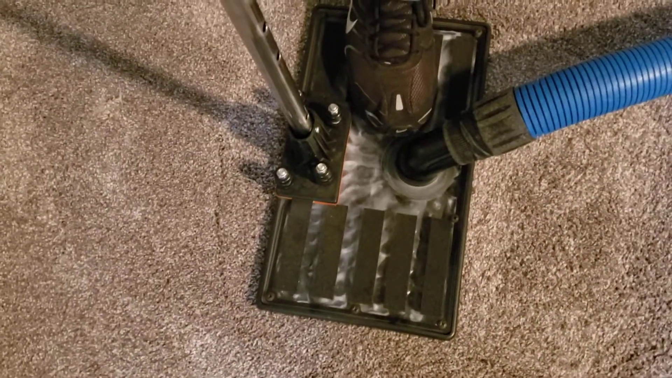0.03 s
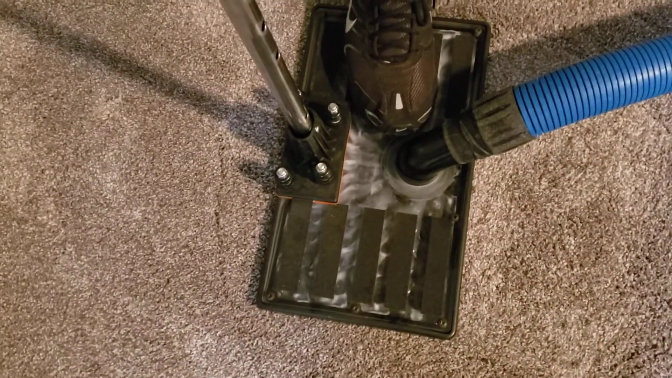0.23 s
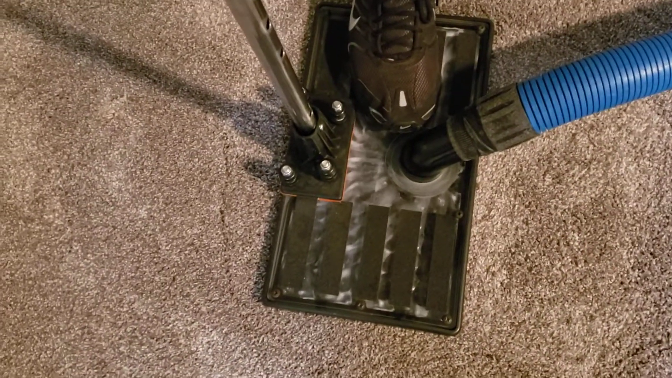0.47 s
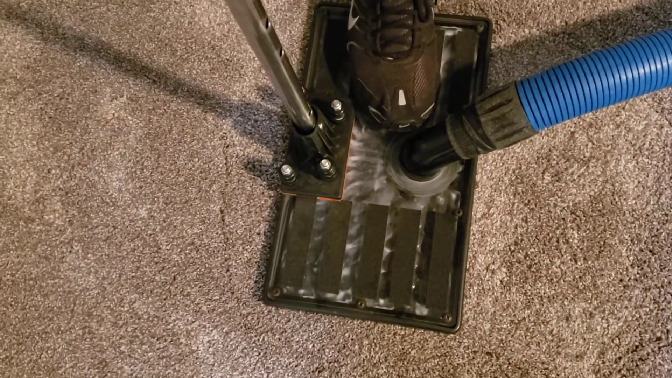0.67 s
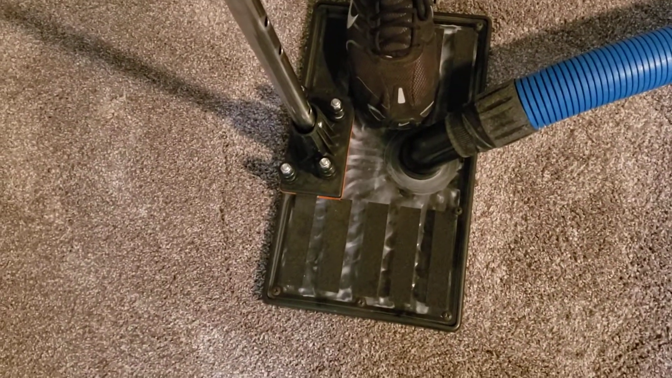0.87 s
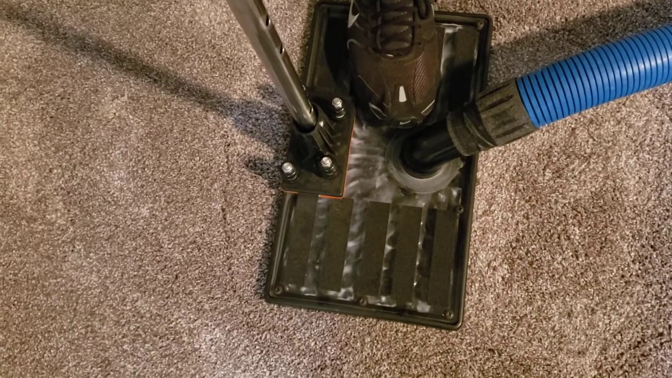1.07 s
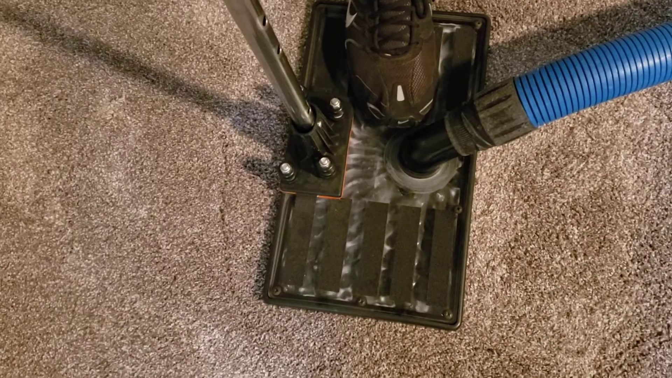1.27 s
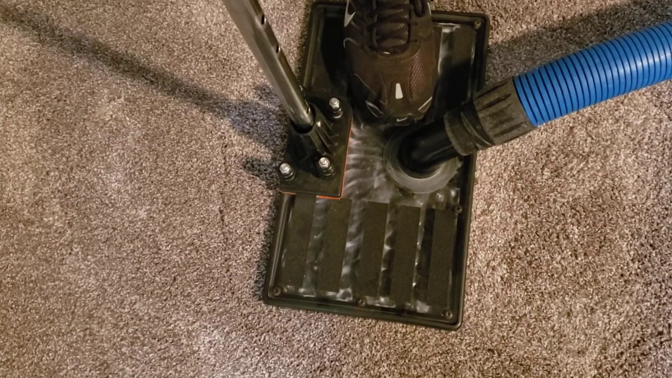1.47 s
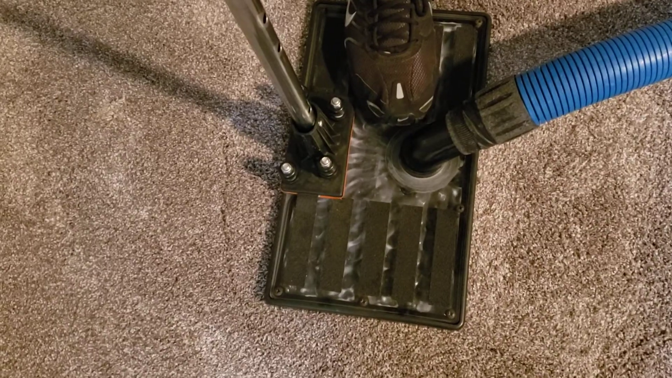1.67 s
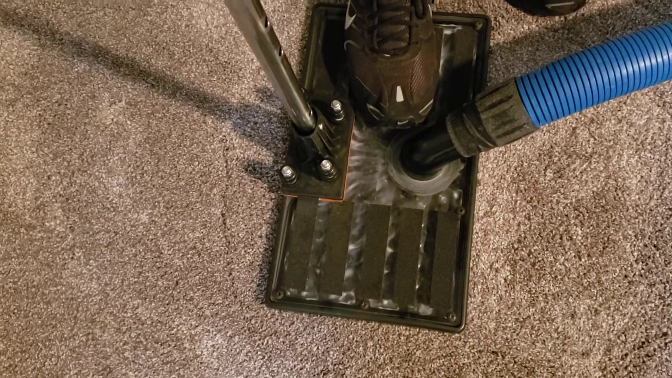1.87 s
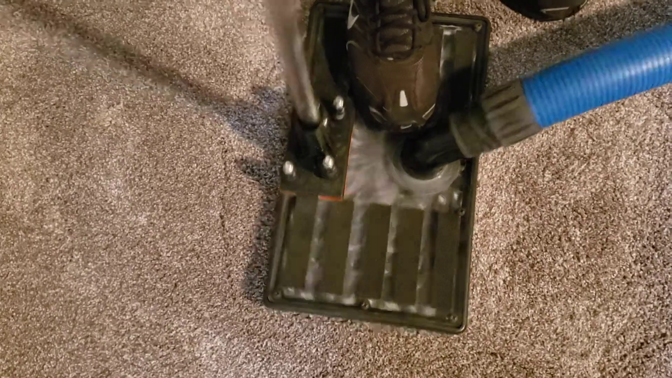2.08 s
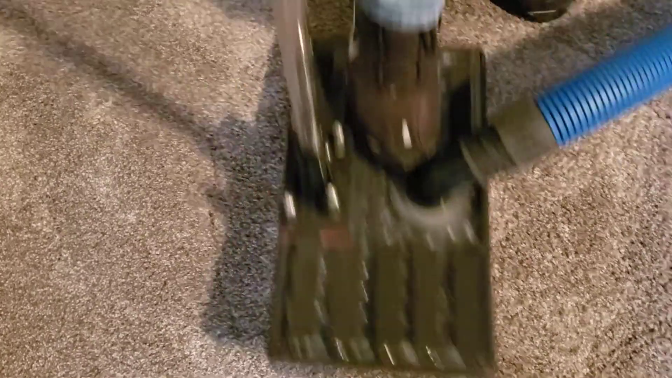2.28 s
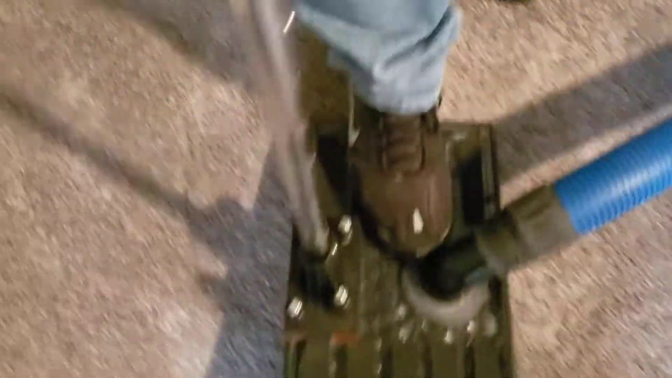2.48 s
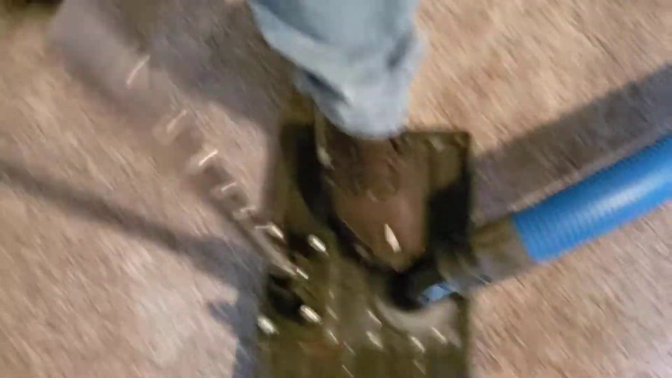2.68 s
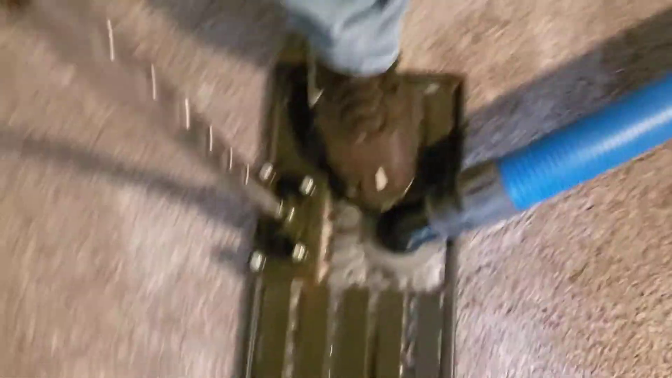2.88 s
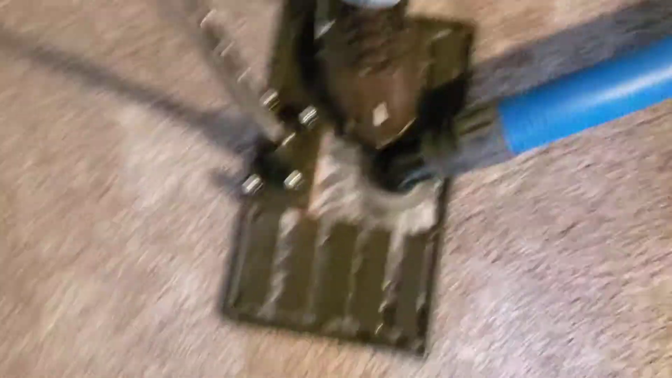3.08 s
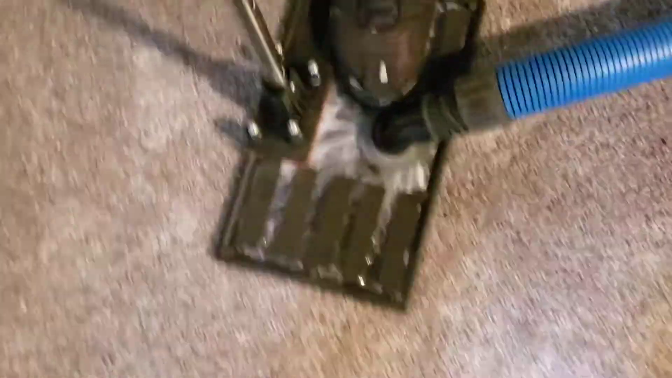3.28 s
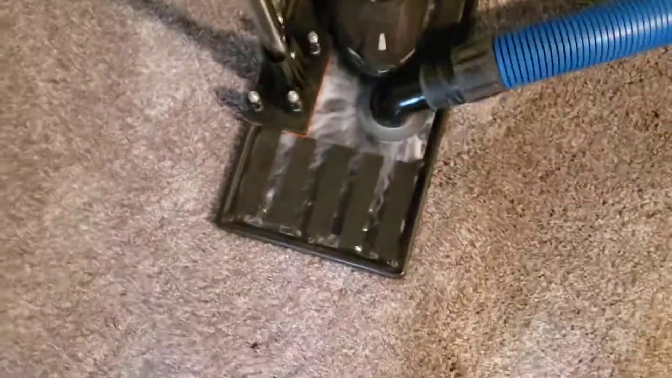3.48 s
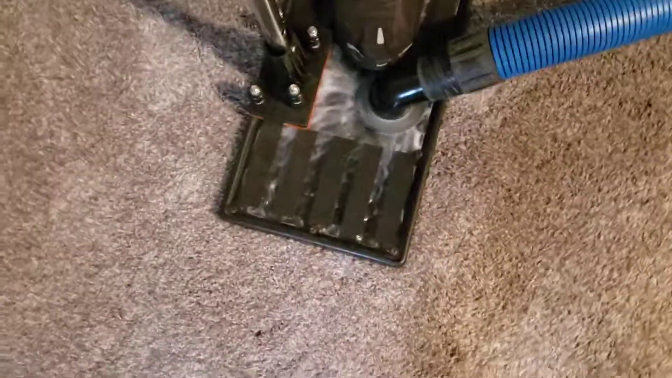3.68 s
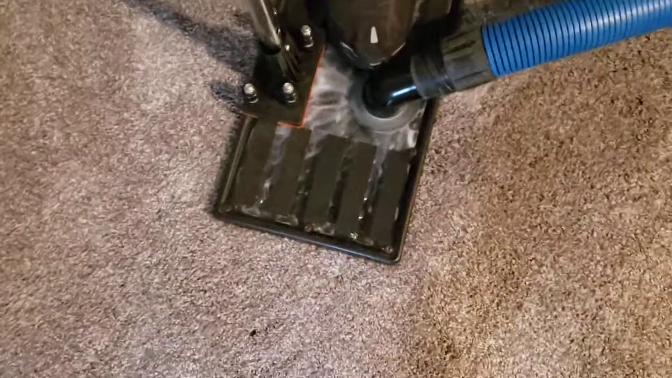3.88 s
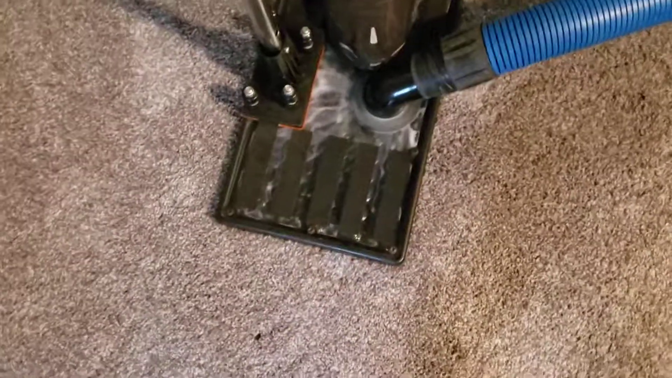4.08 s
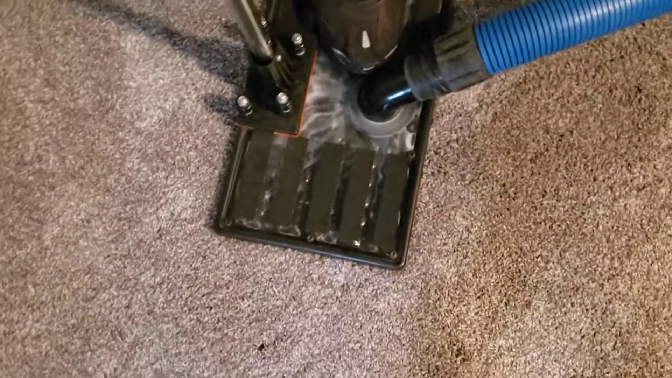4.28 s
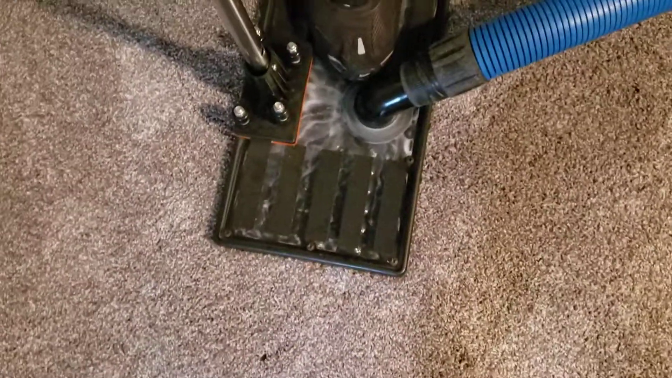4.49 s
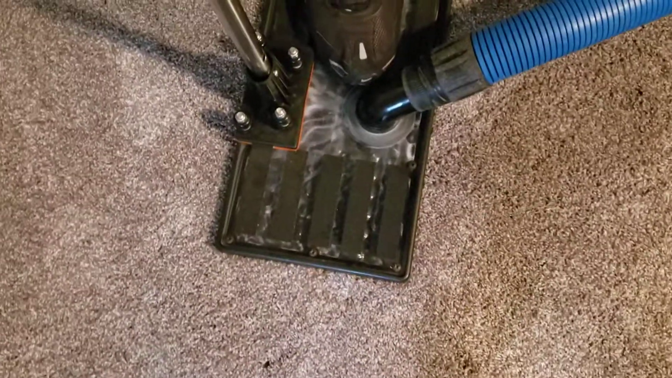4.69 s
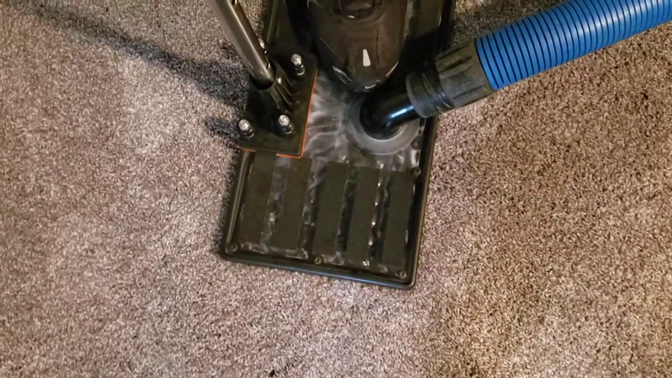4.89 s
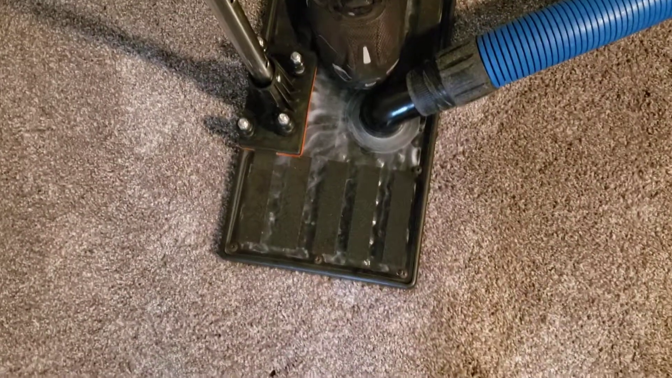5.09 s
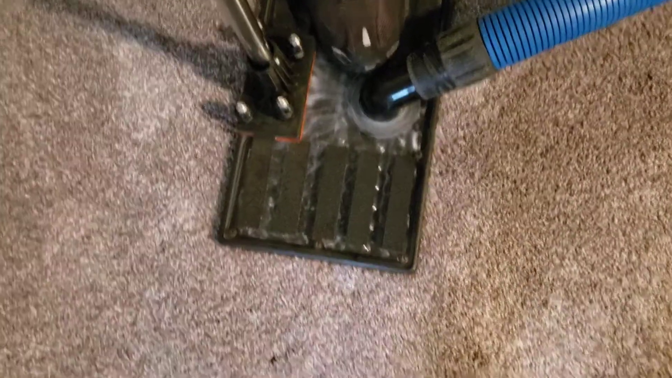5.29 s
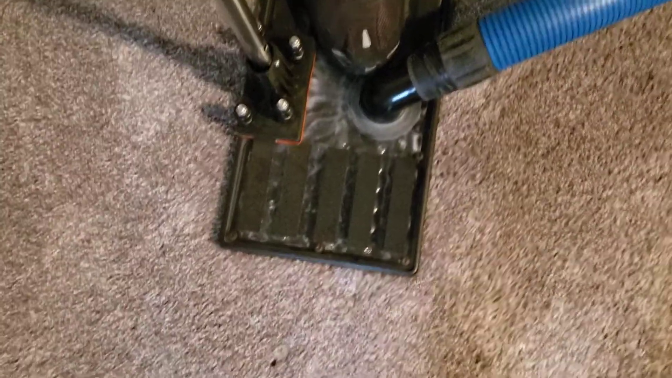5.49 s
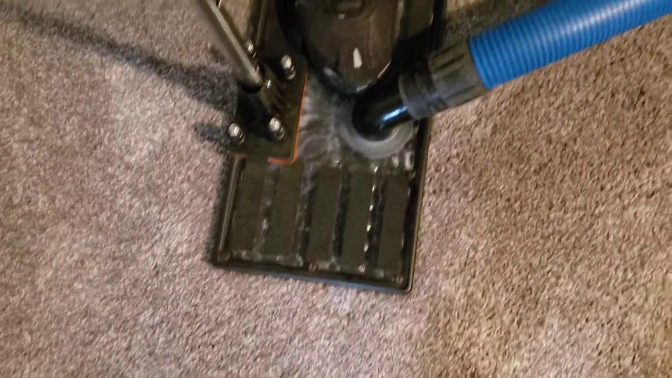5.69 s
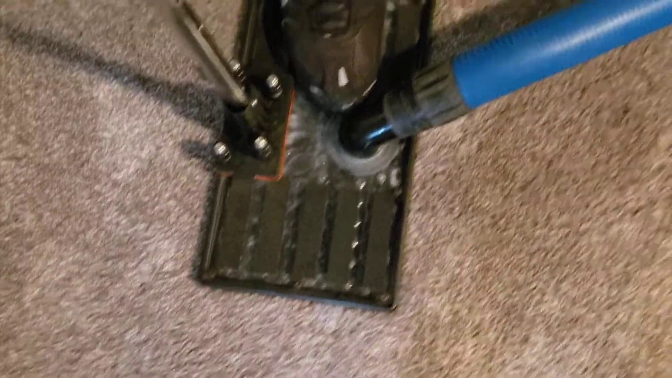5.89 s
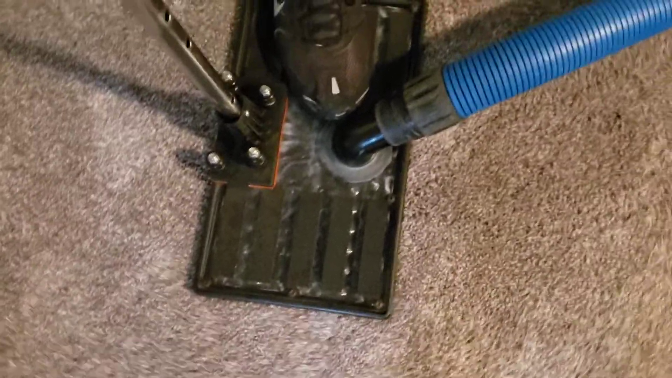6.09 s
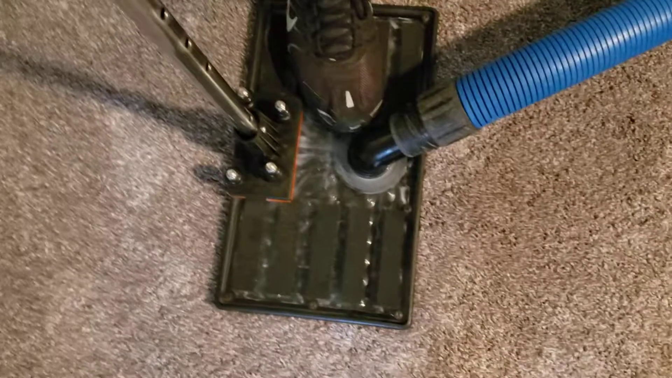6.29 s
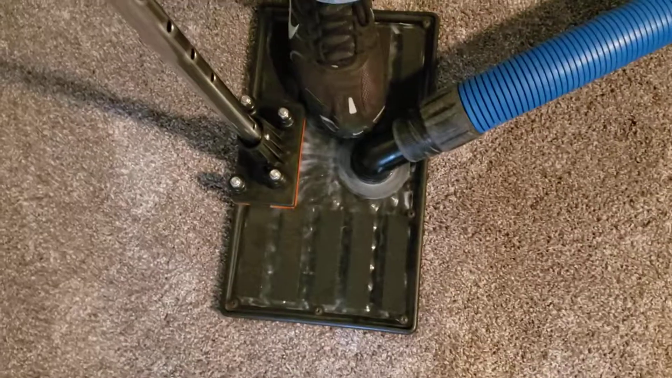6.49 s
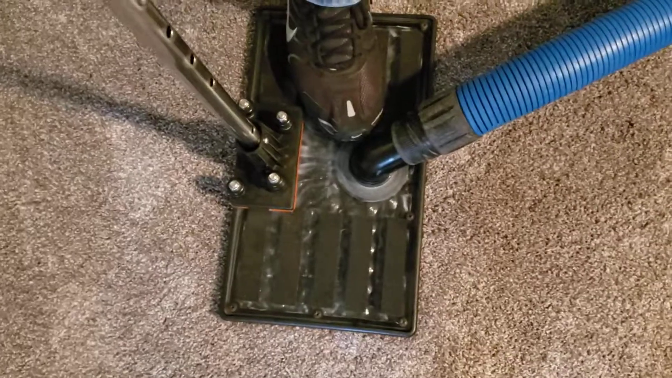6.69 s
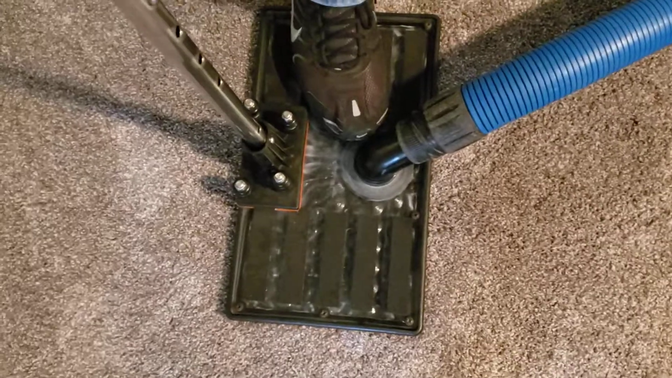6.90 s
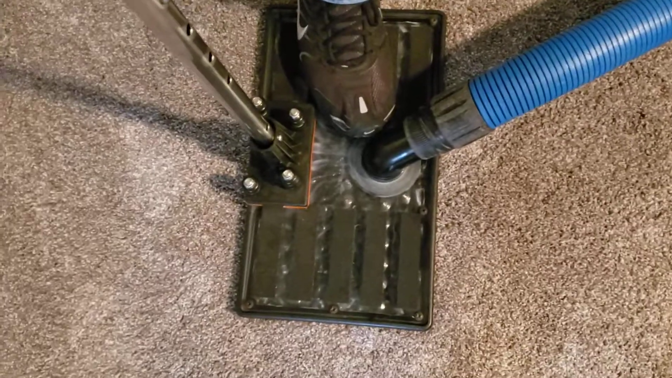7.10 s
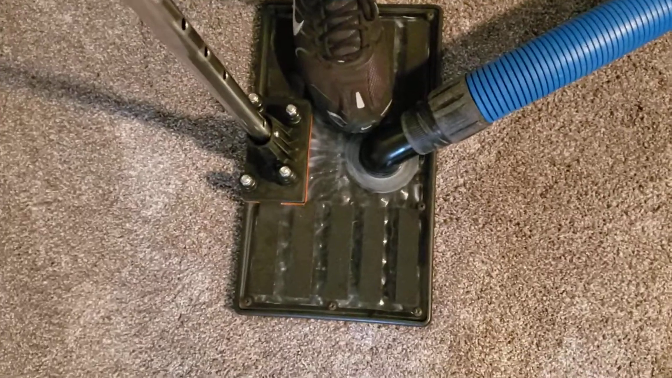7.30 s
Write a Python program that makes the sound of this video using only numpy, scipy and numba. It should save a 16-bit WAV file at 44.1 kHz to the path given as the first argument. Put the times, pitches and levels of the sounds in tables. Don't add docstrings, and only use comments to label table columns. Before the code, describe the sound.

From 0 to 2 seconds a flat extraction tool sits on wet carpet indoors, giving a dense, steady, moderately quiet high hiss with a bright sputtering edge. Beneath it are faint watery gargles in the tool's hollows, slight hose rumble and a low, gently wavering engine and blower hum. At about 2.06 the plate scuffs, with dull low knocks up to 2.2. Around 2.15 the seal breaks in a loud, very high airy squeal, then air rushes into the hose with a hollow roar sliding downward until 2.75. At 2.78 the plate thuds down with a weaker squeal, sealed by 3.0. The hiss resumes with a slightly different colour, sinking quietest near 3.5, then rising slowly from 4.1 to its former level by 5.6. It continues evenly to 7.3. Close stereo pickup, crisp but without the extreme top.

```python
import sys
import numpy as np
from scipy import signal
from scipy.io import wavfile
from numba import njit

SR = 44100
rng = np.random.default_rng(int(sys.argv[2]) if len(sys.argv) > 2 else 0)


def volts_from_decibels(level):
    exponent = np.asarray(level, float) / 20
    return 10 ** exponent


def wav_out(sig):
    wavfile.write(sys.argv[1], SR, np.round(np.clip(np.atleast_2d(sig).T, -1, 1) * 32767).astype(np.int16))


N = 323694
T = np.arange(N) / SR

OPENS_S, SHUTS_S = 2.145, 2.765
OPEN_S = SHUTS_S - OPENS_S
MOVED = T > 2.5

# start_s, level_db
SEALED_LEVEL = [
    (0, -41),
    (.42, -37),
    (2.06, -37),
    (2.3, -38),
    (2.85, -42),
    (3.45, -45.5),
    (4.11, -44.5),
    (5.0, -41),
    (5.57, -37),
    (7.34, -37.5),
]
# pitch_hz, level_db (per Hz)
HISS_FIRST = [(410, -20), (700, -8.5), (839, -15), (1230, -12.5), (1660, -4), (1850, -12), (2020, -10),
              (2630, -1.5), (3030, -4.5), (3630, 1), (4590, 0), (5330, 0), (9000, -0.5), (11700, -76),
              (19800, -120)]
HISS_SECOND = [(410, -62), (700, -6), (831, -11.5), (1060, -17.5), (1400, -5), (1890, -5.5), (2060, -7),
               (2240, -9), (2780, -0.5), (4350, 2.5), (7350, 3.5), (8170, -0.5), (9000, -5), (11700, -44),
               (19800, -120)]
# pitch_hz, level_db (per Hz)
JET_FIRST = [(4710, 30), (8000, -17), (9850, -7.5), (11400, 0), (12000, 3.5), (13300, -4), (14400, -0.5),
             (15800, -16.5)]
JET_SECOND = [(4710, -8), (8000, -19), (10600, -8.5), (11700, -4), (14200, -7), (15000, -11),
              (15800, -12.5)]
# pitch_hz, level_db (per Hz)
RUMBLE_FIRST = [(25, -26), (42, 0), (52, -28), (80, 3.5), (105, -17), (150, -7), (215, -1.5), (300, -5.5),
                (450, -7.5), (600, -2.5), (760, -15), (1100, -21)]
RUMBLE_SECOND = [(25, -20), (42, -2), (52, -20), (80, -2.5), (105, -6), (150, -15), (215, 0.5), (300, -9),
                 (450, -12), (600, -8), (760, -14.5), (1100, -10.5)]
# pitch_hz, width_hz, level_db
HOLLOWS_FIRST = [(80, 11, -25), (220, 12, -25), (520, 38, -20), (836, 48, -21.5), (1650, 240, -12.5),
                 (1950, 100, -15.5), (2614, 220, -12.5), (4540, 120, -21)]
HOLLOWS_SECOND = [(77, 13, -25), (333, 27, -22), (415.6, 13.4, -22), (537, 7.2, -24), (710, 32, -23),
                  (840, 21, -22), (1895, 114, -10), (2306, 59, -12), (3800, 620, -24)]
# pitch_hz, shared_part (0-1)
LIKENESS = [(60, .99), (150, 1), (380, 0.89), (950, 0.35), (2380, 0.42), (5980, 0.12), (15000, 0.14)]
# pitch_hz, left_minus_right_db
SIDE = [(60, 3), (125, 3), (200, 0.5), (380, 5), (700, 0), (1290, 3), (2380, -3), (4400, -2.5), (8120, -2),
        (15000, 6)]
# delay_ms, left_gain, right_gain
ECHOES = [(0, 1, 1), (.5, 0.12, 0.043), (.72, -0.2, -0.072), (1.95, 0.37, -0.093), (2.4, -0.094, 0.35),
          (3.3, 0.031, 0.24), (4.4, -0.38, 0.35)]
# start_s, engine_third_order_hz, blower_tone_db
ENGINE = [(0, 188.5, -25), (.6, 188.8, -17), (.95, 189.3, -24.5), (1.2, 189.2, -17.5), (1.5, 189.2, -32),
          (1.75, 189.4, -15), (2.1, 189.4, -16), (2.6, 191.3, -20.5), (3.1, 192, -13.5),
          (3.5, 190.5, -18.5), (3.7, 189, -20), (4.17, 188, -22), (4.24, 187.8, -15), (4.5, 188.1, -14.5),
          (4.8, 189, -19.5), (6.2, 190, -15), (7.34, 190.4, -19.5)]
# order (multiple of turning speed), first_spot_db, second_spot_db (above the hiss), roughness (0-1)
ENGINE_ORDERS = [(1, -15.5, -16, 0.42), (2, -22.5, -22.5, 1), (3, -18.5, -15.5, 0)]
# start_s, peak_db, pitch_hz, fade_by_60_db_s
KNOCKS = [
    (2.062, -29.5, 110, 0.13),
    (2.131, -29, 100, 0.066),
    (2.218, -35, 131, 0.07),
    (2.779, -29.5, 70, 0.12),
    (2.845, -37.5, 60, .14),
]
# start_s, opening (0-1)
GAP = [
    (2.1, 0),
    (2.2, 0.4),
    (2.37, 0.95),
    (2.59, 1),
    (2.74, 0.67),
    (2.79, 0.38),
    (2.85, .22),
    (3.0, 0),
]
# full_at_s, peak_db
SQUEALS = [
    (2.15, -13.5),
    (2.79, -19),
]
# pitch_hz, width_hz, gain
RIM_SLOTS = [(9700, 700, 0.5), (11330, 850, 1.6), (12700, 430, 0.27), (14140, 520, 1.2)]
# full_at_s, level_db, rise_s, fade_db_per_s
UPPER_SWELLS = [
    (2.15, -39, 0.098, 330),
    (2.745, -42, 0.53, 492),
]
# pitch_hz, level_db (per Hz)
RUSH = [(90, -7.5), (200, -9.5), (500, -10.5), (1200, -10.5), (2200, -16.5), (3200, -12.5), (5500, -16.5),
        (7500, -8), (9800, 1.5), (15000, -9.5)]


def rms_one(x):
    return x / np.sqrt(np.mean(x ** 2) + 1e-20)


def in_time(rows):
    s, *columns = np.transpose(rows)
    return [np.interp(T, s, column) for column in columns]


def at_hz(points, hz):
    table_hz, value = np.transpose(points)
    return np.interp(np.log(hz), np.log(table_hz), value)


def butter(x, order, hz, kind):
    return signal.sosfilt(signal.butter(order, hz, kind, fs=SR, output="sos"), x)


def drift(rate_hz):
    r = np.exp(-80 * np.pi * rate_hz / SR)
    noise = rng.standard_normal(N // 40 + 2002)
    slow = rms_one(signal.lfilter([1], [1, -2 * r, r * r], noise)[2000:])
    return np.interp(np.arange(N) / 40, np.arange(len(slow)), slow)


def swell(s, rise_s, hold_s, fade_db_per_s):
    t = T - s
    rise_db = 40 * t / rise_s
    fade_db = -fade_db_per_s * (t - hold_s)
    return volts_from_decibels(np.minimum(0, np.minimum(rise_db, fade_db)))


def lean(db):
    return volts_from_decibels(np.array([db / 2, -db / 2]))


def echoed(x):
    paths = np.zeros((2, 256))
    for ms, left, right in ECHOES:
        paths[:, round(ms * SR / 1000)] += left, right
    bass = butter(x, 1, 350, "low")
    return bass + np.array([signal.lfilter(p / np.linalg.norm(p), [1], x - bass) for p in paths])


@njit
def glide(x, hz, width_hz, sr):
    y, r = np.zeros_like(x), np.exp(-np.pi * width_hz / sr) + 0 * hz
    for i in range(2, len(x)):
        ring = 2 * r[i] * np.cos(2 * np.pi * hz[i] / sr) * y[i - 1] - r[i] * r[i] * y[i - 2]
        y[i] = x[i] - x[i - 2] + ring
    return y


def turbulence(first, second, low_hz, high_hz, count, patchy_db, surge_db):
    edges = np.geomspace(low_hz, high_hz, count + 1)
    surge = drift(32)
    shared = [echoed(noise) for noise in rng.standard_normal((2, N))]
    own = rng.standard_normal((2, 2, N))
    out = 0
    for k, (low, high) in enumerate(zip(edges, edges[1:])):
        hz = np.sqrt(low * high)
        alike = np.clip(at_hz(LIKENESS, hz), 0, 0.99)
        white = np.sqrt(alike) * shared[k % 2] + np.sqrt(1 - alike) * own[k % 2]
        pair = butter(white, 2, [low, high], "band")
        colour_db = np.where(MOVED, at_hz(second, hz), at_hz(first, hz))
        gain = volts_from_decibels(colour_db + surge_db * surge + patchy_db * drift(26))
        out = out + gain * pair * lean(at_hz(SIDE, hz))[:, None]
    return out / np.where(MOVED, np.std(out[:, MOVED]), np.std(out[:, ~MOVED]))


def spray(per_s, depth):
    drops = (rng.random(N) < per_s / SR) * rng.exponential(1, N)
    r = np.exp(-1 / (0.00086 * SR))
    return rms_one(1 + depth * signal.lfilter([1], [1, -r], drops))


def hollows():
    slugs = drift(18)
    out = 0
    for rows, here in (HOLLOWS_FIRST, ~MOVED), (HOLLOWS_SECOND, MOVED):
        for hz, width_hz, db in rows:
            lumps = volts_from_decibels(2.3 * slugs + 2.6 * drift(35)) * rng.standard_normal(N)
            gargle = rms_one(glide(lumps, np.full(N, float(hz)), float(width_hz), SR))
            out = out + here * volts_from_decibels(db - 3) * gargle
    return echoed(out)


def sealed_tool(level_db):
    hiss = turbulence(HISS_FIRST, HISS_SECOND, 736, 9630, count=18, patchy_db=0.87, surge_db=0.2)
    jet = turbulence(JET_FIRST, JET_SECOND, 7505, 16420, count=12, patchy_db=0.85, surge_db=0.2)
    jet *= spray(per_s=250, depth=0.25)
    rumble = turbulence(RUMBLE_FIRST, RUMBLE_SECOND, 32.0, 1107, count=19, patchy_db=1.5, surge_db=0.5)
    rumble = butter(rumble, 2, 32, "high")
    scuff = volts_from_decibels(-6.5) * swell(2.06, 0.2, 0, fade_db_per_s=14)
    rumble *= np.hypot(volts_from_decibels(-15.5), scuff)
    return volts_from_decibels(level_db) * (volts_from_decibels(5.5) * hiss + volts_from_decibels(15) * jet + rumble + hollows())


def machine(level_db):
    third_hz, lobe_db = in_time(ENGINE)
    lobe_hz = 266.1 + 2.465 * (third_hz - 189.4)
    standing_wave_rad = 1.3
    lobe_turn = 2 * np.pi * np.cumsum(lobe_hz) / SR + [[0], [standing_wave_rad]]
    out = np.sqrt(2) * volts_from_decibels(lobe_db) * np.sin(lobe_turn) * lean(-8.0)[:, None]
    load_db = -10 * swell(OPENS_S + 0.2, 0.61, OPEN_S, fade_db_per_s=6)
    turn = 2 * np.pi * np.cumsum(third_hz / 3) / SR
    for order, first_db, second_db, rough in ENGINE_ORDERS:
        waver = 1 + rough * (drift(21) + 1j * drift(6.2))
        level = volts_from_decibels(np.where(MOVED, second_db, first_db) + load_db / order)
        tone = np.sqrt(2) * level * np.real(waver * np.exp(1j * order * turn))
        out = out + tone * lean(at_hz(SIDE, 63 * order))[:, None]
    return volts_from_decibels(level_db) * out


def knocks():
    out = np.zeros(N)
    scuff = rms_one(butter(rng.standard_normal(N), 4, [90, 700], "band"))
    for s, db, hz, t60 in KNOCKS:
        t = np.maximum(T - s, 0)
        onset = np.minimum(t / 0.0047, 1)
        out += volts_from_decibels(db - 60 * t / t60) * (np.sin(2 * np.pi * hz * t) + 0.3 * scuff) * onset
    return butter(out, 2, 40, "high") * lean(1.1)[:, None]


def swept(x, hz, width_hz):
    y = glide(glide(x, hz, width_hz, SR), hz, width_hz, SR)
    return rms_one(y * width_hz ** 1.5)


def while_open(first, last):
    return np.interp(T, [OPENS_S, SHUTS_S], [first, last])


def slots(x):
    out = x
    for hz, width_hz, gain in RIM_SLOTS:
        out = out + gain * signal.lfilter(*signal.iirpeak(hz, hz / width_hz, fs=SR), x)
    return rms_one(butter(out, 3, 8400, "high"))


def gap_jet(squeal_shapes):
    gap, = in_time(GAP)
    shut_hz, open_hz, width_hz = 13530, 10230, 2960
    jet_hz = shut_hz + (open_hz - shut_hz) * gap
    squeal = sum(volts_from_decibels(db) * shape for (s, db), shape in zip(SQUEALS, squeal_shapes))
    steady = volts_from_decibels(-24 - 26 * (1 - gap)) * swell(OPENS_S, 0.1, OPEN_S, fade_db_per_s=107)
    air = echoed(rng.standard_normal(N)) + 0.7 * rng.standard_normal((2, N))
    jet = np.array([swept(side, jet_hz, np.full(N, float(width_hz))) for side in air])
    return slots(jet) * np.hypot(squeal, steady) * lean(5.5 + 1.5 * sum(squeal_shapes))


def hose_roar(duck):
    mouth_hz, lag_s = while_open(580, 325), 0.025
    air = rng.standard_normal(N) + 0.25 * rng.standard_normal((2, N))
    roar = np.array([swept(side, mouth_hz, 0.77 * mouth_hz) for side in air])
    shape = swell(OPENS_S + lag_s, 0.045, OPEN_S - lag_s, fade_db_per_s=400)
    return roar * volts_from_decibels(while_open(-35, -38)) * shape * np.sqrt(duck) * lean(1.9)[:, None]


def hose_neck(duck, flowing):
    neck_hz, upper_hz = while_open(4300, 3790), while_open(1290, 1110)
    air = rng.standard_normal((2, N))
    neck = volts_from_decibels(-45.5) * swell(OPENS_S, 0.2, OPEN_S, fade_db_per_s=32) * duck
    upper = volts_from_decibels(-51) * flowing
    for s, db, rise_s, fade in UPPER_SWELLS:
        upper = upper + volts_from_decibels(db) * swell(s, rise_s, 0.013, fade)
    neck_sound = neck * echoed(swept(air[0], neck_hz, 0.079 * neck_hz))
    return neck_sound + upper * echoed(swept(air[1], upper_hz, 0.5 * upper_hz))


def broken_seal():
    squeal_shapes = [swell(s, 0.086, 0.056, fade_db_per_s=107) for s, db in SQUEALS]
    duck = volts_from_decibels(-2.5 * squeal_shapes[0])
    flowing = swell(OPENS_S, 0.11, OPEN_S, fade_db_per_s=400)
    pop = volts_from_decibels(-20) * swell(OPENS_S, 0.13, 0, fade_db_per_s=500)
    inrush = np.hypot(volts_from_decibels(-26.5) * flowing * duck, pop)
    rush = inrush * turbulence(RUSH, RUSH, 95.6, 13800, count=14, patchy_db=-1.4, surge_db=1)
    return gap_jet(squeal_shapes) + hose_roar(duck) + hose_neck(duck, flowing) + rush


def scene():
    level_db, = in_time(SEALED_LEVEL)
    left, right = sealed_tool(level_db) + machine(level_db) + knocks() + broken_seal()
    low = signal.sosfiltfilt(signal.butter(2, 2500, fs=SR, output="sos"), left)
    return np.array([left - low + np.roll(low, 2), right])


def top_cut(x):
    return signal.sosfilt(signal.butter(12, 15970, fs=SR, output="sos"), x)


def record(dry):
    cut = signal.sosfilt(signal.ellip(12, 0.5, 55, 15730, fs=SR, output="sos"), dry)
    return top_cut(np.clip(cut, -1, 1))


dry = scene()
out = record(dry)
wav_out(out)
```